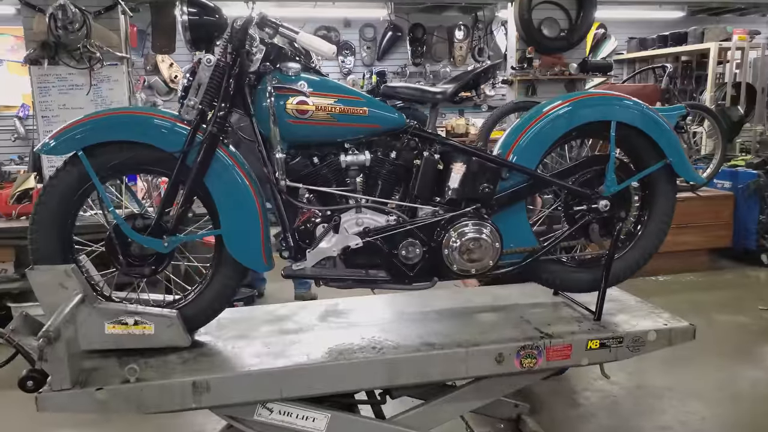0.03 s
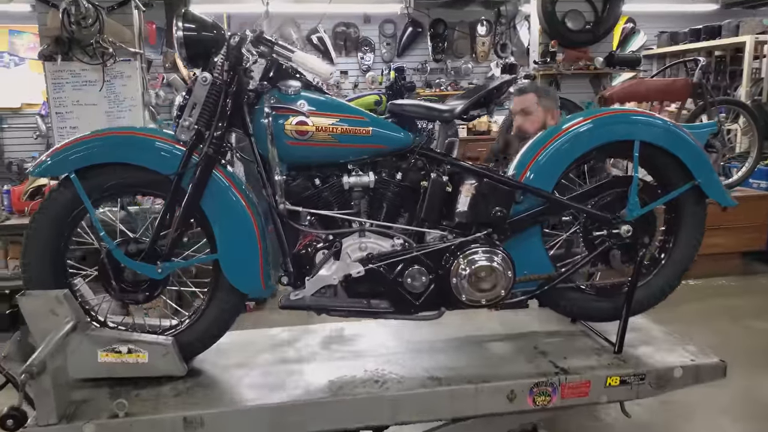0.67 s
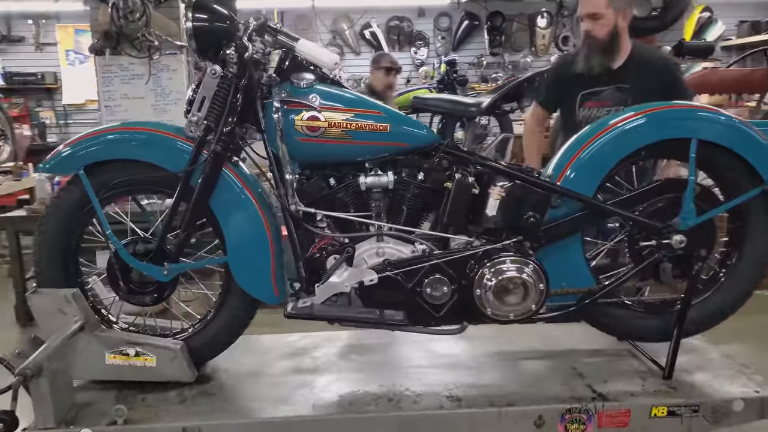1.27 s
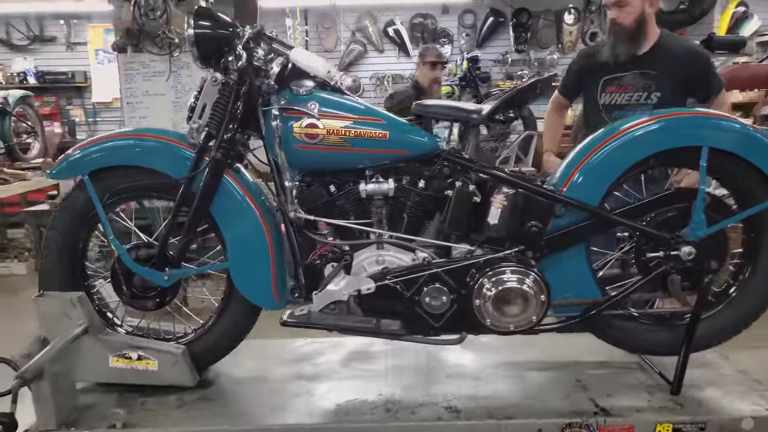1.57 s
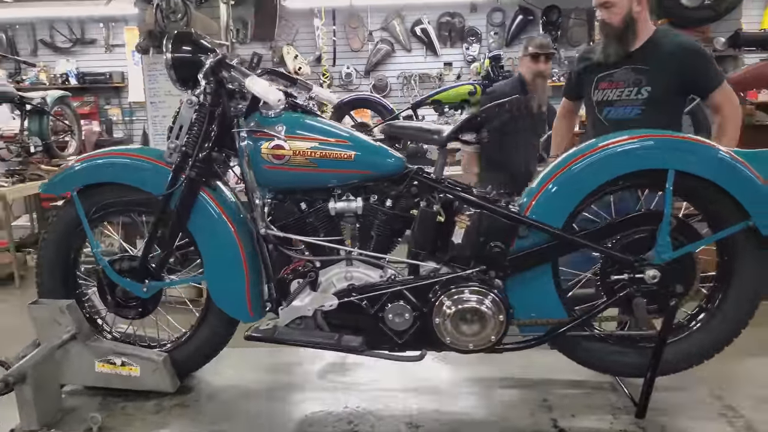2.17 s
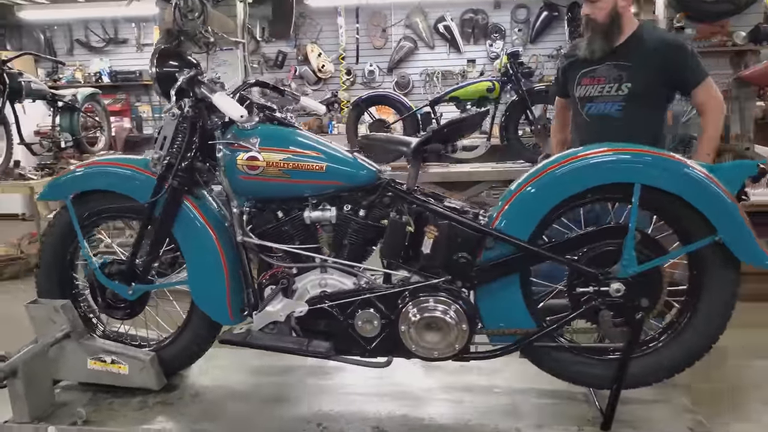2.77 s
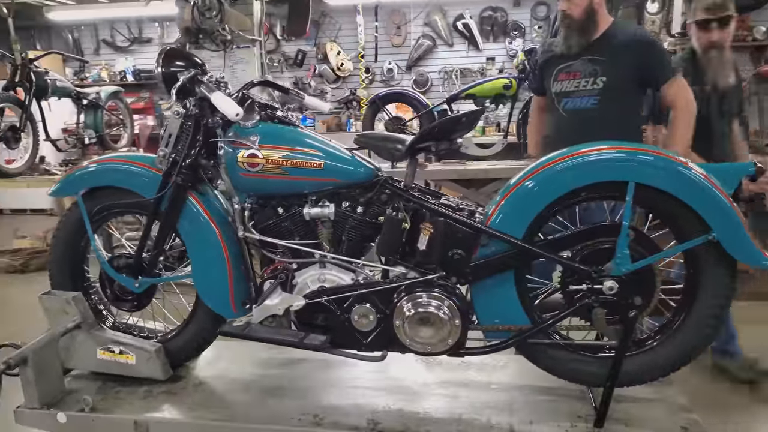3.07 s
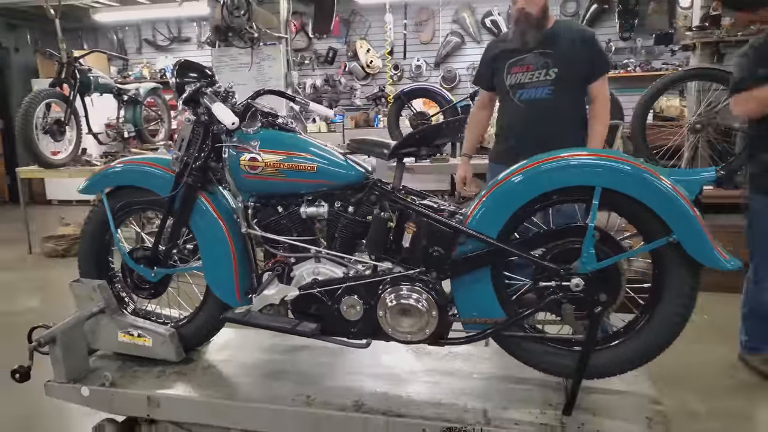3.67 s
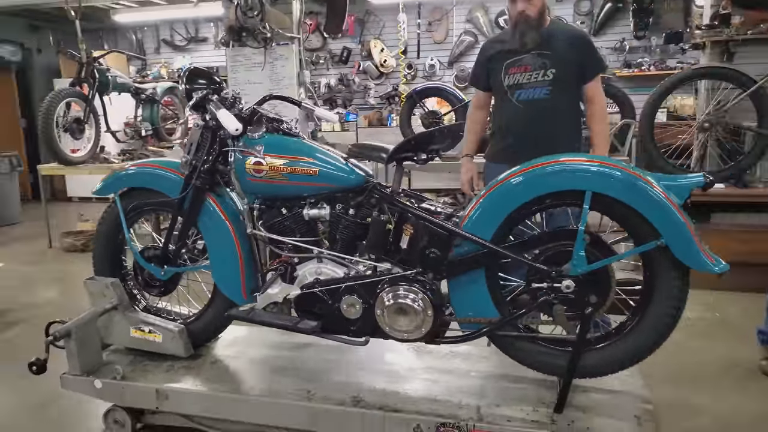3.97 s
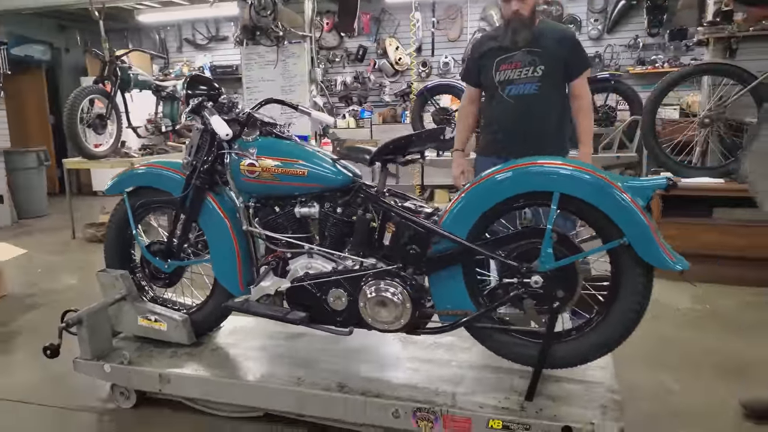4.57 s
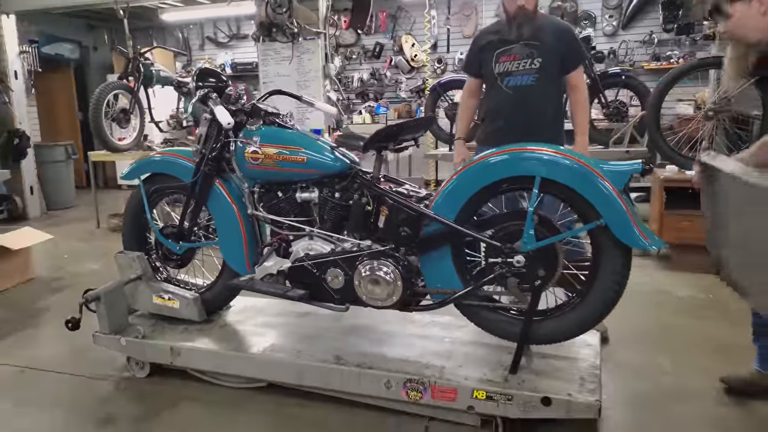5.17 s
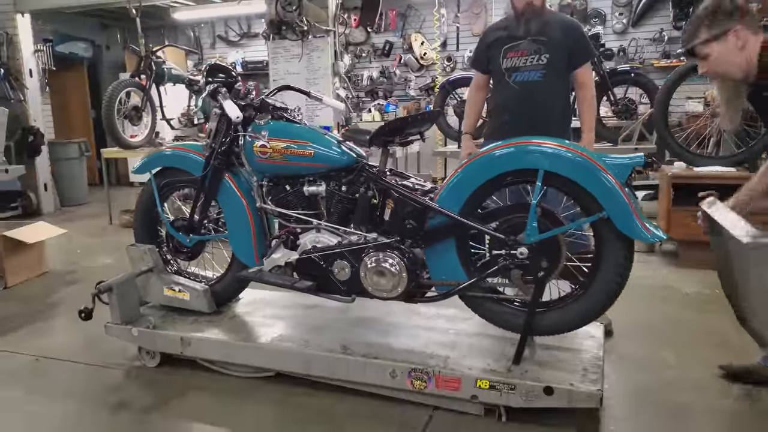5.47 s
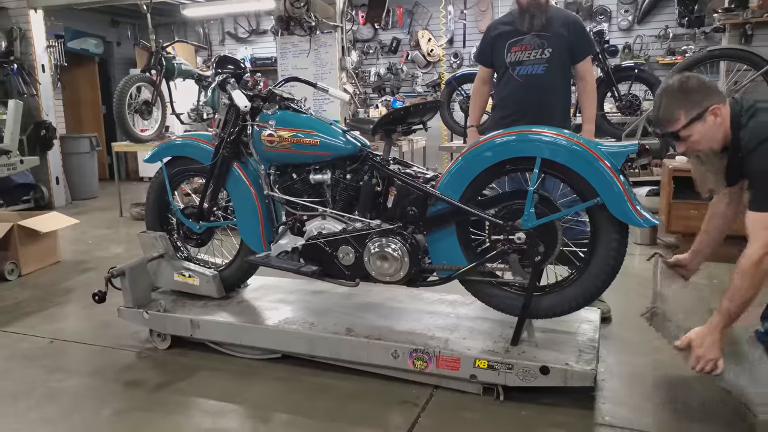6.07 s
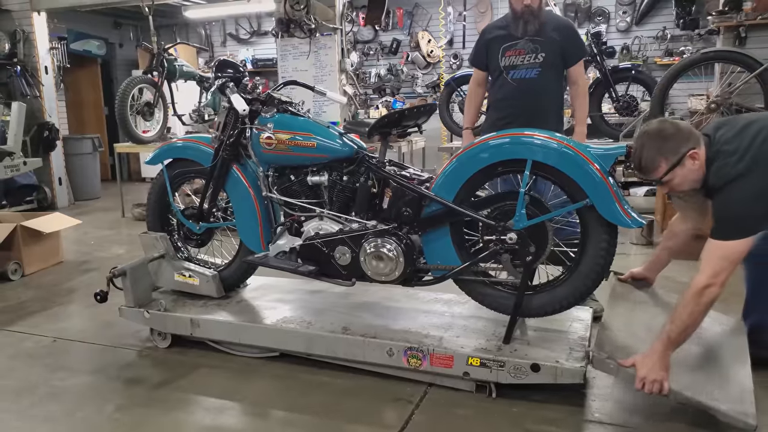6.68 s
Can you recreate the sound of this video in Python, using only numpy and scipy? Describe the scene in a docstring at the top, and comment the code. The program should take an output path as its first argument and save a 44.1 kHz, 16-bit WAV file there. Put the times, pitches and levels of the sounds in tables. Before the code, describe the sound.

A bright, continuous hiss of vented air dominates as a motorcycle lift sinks, heard from a hand-held microphone backing away in a quiet workshop. A few soft footfalls sound underneath. The table touches down with a dull, ringing knock, then smaller knocks and short low groans. As the pressure runs out, the hiss turns hollow and fades, leaving shoe scuffs and the hollow bumps of a steel ramp being set down.

```python
"""Pneumatic lift table sinking

A lift table sinks under a motorcycle in a workshop, heard from a hand-held camera that backs away.
Air hisses from the vent until the pressure is spent; the steel deck rumbles, groans, lands and settles
with a few knocks. Shoes thud and scuff on the concrete while a steel ramp is carried up."""
import sys
import numpy as np
from scipy import signal
from scipy.fft import rfft, irfft
from scipy.io import wavfile
from scipy.ndimage import uniform_filter1d, map_coordinates

SR = 44100
rng = np.random.default_rng(int(sys.argv[2]) if len(sys.argv) > 2 else 0)


def master_out(mix):
    """Clip the mix to full scale and print it as 16-bit PCM to the path in sys.argv[1]."""
    frames = np.transpose(np.atleast_2d(mix))
    ceiling = np.clip(frames, -1, 1)
    pcm = np.round(ceiling * 32767).astype(np.int16)
    wavfile.write(sys.argv[1], SR, pcm)


N = 301203
TIME = np.arange(N) / SR

# room tone of the still workshop: freq_hz, density_db
SHOP_SPECTRUM = [(20, -5), (45, -3), (110, -13), (220, -13), (400, -21.5), (700, -28), (1100, -28),
                 (2500, -33.5), (5000, -31), (15500, -34.5)]
# a hand shifting on the camera: centre_s, length_s, level_db
HAND_BUMPS = [(1.02, .13, -45), (1.16, .11, -40.5), (1.82, 0.11, -53.5), (4.037, 0.093, -38),
              (5.28, 0.081, -36.5), (6.048, 0.27, -62)]
# shoes landing: start_s, peak_db, pitch_hz, t60_s
FOOTFALLS = [(.933, -38, 118, 0.32), (1.039, -43, 90, .25), (1.82, -57, 119, .2), (2.059, -50, 140, .06),
             (2.585, -45, 170, 0.087), (5.789, -49, 129, 0.037), (6.272, -47.5, 129, 0.061),
             (6.592, -43.5, 120, .039)]
# soles scuffing: centre_s, length_s, level_db, pitch_hz, width_hz
SOLE_SCUFFS = [(5.959, .009, -45, 2800, 4500), (6.129, 0.058, -54, 1900, 2200)]
# hollow bumps of the carried ramp: start_s, peak_db, pitch_hz, rebound_loss_db
RAMP_HITS = [(5.861, -32.5, 256, 4.5), (6.309, -36, 273, 8.5)]
# ring of the steel ramp: pitch_hz, width_hz, gain_db
RAMP_MODES = [(1090, 400, -11), (1510, 240, -0.5), (1640, 140, -2), (1816, 98, 0), (3290, 700, -19.5),
              (4730, 1500, -28)]
# ring of the loaded steel deck: pitch_hz, gain_db, t60_s
DECK_MODES = [(71, -13, .55), (124, -4, .42), (153, -13, .45), (200, -5, .95), (236, 0, .38),
              (276, -11, .25), (317, -10, .5), (330, -4, .25), (404, -8, .25), (470, -12, .2),
              (525, -9, .18), (571, -11, .6)]
# tones of the scissor arms under load: pitch_hz, level_db
DESCENT_GROANS = [(125, -51.5), (146, -49.5), (184, -61.5), (276, -59.5), (571, -56)]
# short groans as the frame rebounds: start_s, length_s, pitch_hz, level_db
REBOUND_GROANS = [(4.48, 0.091, 153, -34.5), (4.59, 0.12, 155, -43), (4.95, .08, 190, -43.5)]
# knocks of the settling frame: start_s, peak_db, cutoff_hz, rattle_decay_s, ring_share
FRAME_KNOCKS = [(0.3, -40.5, 331, 0.053, 0.2), (0.365, -39, 480, 0.043, 0.18), (4.106, -22, 650, .02, 1),
                (4.453, -29, 591, 0.056, 0.42), (4.505, -35.5, 379, 0.033, 0.36),
                (4.599, -34, 350, 0.018, .25), (4.954, -36, 298, 0.063, 0.1),
                (5.353, -38.5, 276, 0.03, 0.15)]
# base colour of the vent's jet: freq_hz, density_db
VENT_SPECTRUM = [(100, -36), (330, -38.5), (520, -30.5), (690, -33.5), (810, -22.5), (960, -13.5),
                 (1900, -12), (2700, -7), (3700, 0), (5200, 0), (7500, -1), (9500, -4), (13500, -6.5),
                 (16000, -10)]
# resonances of the vent muffler: pitch_hz, width_hz, gain_db
MUFFLER_MODES = [(2197, 213, 4), (3850, 430, -0.5), (4740, 240, 0.5), (6480, 410, 0.5), (10840, 1000, 2),
                 (14040, 1500, 2)]
# peaks and dips the muffler takes on as the flow weakens: pitch_hz, width_hz, gain_db
HOLLOW_MODES = [(2160, 500, 5.5), (2660, 270, 0), (2980, 450, 4), (4700, 400, -0.5), (6500, 300, 0.5),
                (8100, 500, -3.5), (9650, 800, 5)]
# the vent nearly whistles: centre_s, length_s, pitch_hz, width_hz, boost_db
NEAR_WHISTLES = [(.12, .6, 2170, 200, 5.5), (.78, .7, 5130, 600, 3), (2.0, 0.63, 2260, 221.4, 3.5),
                 (3.52, 0.2, 4050, 179.6, 4), (4.8, .56, 4650, 401, 4.5)]
# rides on the hiss as the camera moves round the vent: time_s, gain_db, treble_db_per_octave
HISS_RIDES = [(0, -23.5, -2.5), (1.0, -23, -3), (2.1, -24, -1.8), (2.9, -22, -5.5), (3.5, -22, -5),
              (4.2, -23, -5.5), (4.8, -23, -4.5)]

SLIDE_STARTS_S, SLIDE_ATTACK_S, LANDS_S = 3.65, 0.071, 4.1
EMPTYING_S, EMPTY_S = 4.765, 6.328  # the pressure runs out between these moments


def undb(db):
    """Decibels to gain."""
    return 10 ** (np.asarray(db) / 20)


def unit(x):
    """Scale to rms 1."""
    return x / np.sqrt(np.mean(x ** 2))


def colour(table, hz):
    """A spectrum's dB at the given frequencies."""
    points, db = np.transpose(table)
    return np.interp(np.log(hz + 1), np.log(points), db)


def hump(f, hz, width_hz):
    """Bell curve of a resonance, 1 at its centre."""
    return 1 / (1 + (2 * (f - hz) / width_hz) ** 2)


def bells(modes, f):
    """EQ curve in dB of a set of resonances."""
    return sum(db * hump(f, hz, width_hz) for hz, width_hz, db in modes)


def noise(curve_db):
    """Noise of rms 1, coloured by an EQ curve."""
    gain = undb(curve_db(np.fft.rfftfreq(N, 1 / SR)))
    return unit(irfft(rfft(rng.standard_normal(N)) * gain, N))


def butter(x, hz, kind, order):
    """Low-pass or high-pass."""
    return signal.sosfilt(signal.butter(order, hz, kind, fs=SR, output="sos"), x)


def band(x, hz, width_hz, passes=2):
    """One broad resonance, steeper with each pass."""
    for _ in range(passes):
        x = signal.lfilter(*signal.iirpeak(hz, hz / width_hz, fs=SR), x)
    return x


def walk(rate_hz):
    """Smooth random drift with a spread near 1."""
    hold = int(SR / rate_hz)
    stairs = np.repeat(rng.standard_normal(N // hold + 1), hold)
    return 1.3 * uniform_filter1d(uniform_filter1d(stairs, hold), hold)[:N]


def since(s):
    """Seconds gone by since a moment, 0 before it."""
    return np.maximum(TIME - s, 0)


def fade(t, t60_s):
    """Decay by 60 dB in t60_s."""
    return np.exp(-np.log(1000) * t / t60_s)


def swell(centre_s, length_s, t):
    """Bell-shaped envelope."""
    return np.exp(-2 * ((t - centre_s) / length_s) ** 2)


def add(out, s, x):
    """Mix a sound in at a time."""
    i = int(s * SR)
    out[i:i + len(x)] += x[:N - i]


def room_tone():
    """Still workshop air, a faint bed weighted to the lows."""
    return noise(lambda f: colour(SHOP_SPECTRUM, f)) * undb(-65.5)


def room(x, t60_s, wet_db):
    """Adds the short diffuse tail of a cluttered workshop."""
    t = TIME[:SR]
    tail = rng.standard_normal(SR) * fade(t, t60_s) * (t > .008)
    return x + undb(wet_db) * signal.fftconvolve(x, tail / np.linalg.norm(tail))[:N]


def handling():
    """Deep bumps carried through the camera's body."""
    rumble = butter(rng.standard_normal(N), 55, "low", order=3)
    rumble = butter(rumble, 24, "high", order=2)
    return unit(rumble) * sum(undb(db) * swell(s, length_s, TIME) for s, length_s, db in HAND_BUMPS)


def thud(peak_db, hz, t60_s, rough, attack_s):
    """A soft, heavy contact: a damped low note roughened by a band of noise."""
    t = TIME[:SR]
    spread = unit(band(rng.standard_normal(SR), hz, 0.69 * hz))
    push = fade(t, t60_s) * (1 - np.exp(-t / attack_s)) ** 2
    note = butter((np.sin(2 * np.pi * hz * t) + rough * spread) * push, 400, "low", order=4)
    return undb(peak_db) * note / np.abs(note).max()


def footsteps():
    """Shoes land on the concrete with a dull thud."""
    out = np.zeros(N)
    for s, db, hz, t60_s in FOOTFALLS:
        add(out, s, thud(db, hz, t60_s, rough=.7, attack_s=.006))
    return out


def scuffs():
    """Rubber drags over grit in short, uneven strokes."""
    out = np.zeros(N)
    for s, length_s, db, hz, width_hz in SOLE_SCUFFS:
        grit = butter(rng.standard_normal(N) * undb(2.3 * walk(300)), 890, "high", order=4)
        out += undb(db) * swell(s, length_s, TIME) * unit(band(grit, hz, width_hz))
    return out


def ramp_bumps(hits=3, gap_s=.047, pitch_ratio=.87):
    """The steel ramp bumps and rebounds, each hit softer and so lower."""
    out = np.zeros(N)
    for s, db, hz, loss_db in RAMP_HITS:
        for k in range(hits):
            bump = thud(db - k * loss_db, hz * pitch_ratio ** k, t60_s=.11, rough=.82, attack_s=.011)
            add(out, s + k * gap_s, bump)
    return out


def ramp_scrape(peak_s=6.312, attack_s=.025, level_db=-50.5):
    """As the ramp is set down, its edge drags over the concrete and rings the steel."""
    grit = rng.standard_normal(N) * undb(2.5 * walk(300))
    ring = sum(undb(db) * band(grit, hz, width_hz) for hz, width_hz, db in RAMP_MODES)
    press = swell(peak_s, attack_s, np.minimum(TIME, peak_s)) * fade(since(peak_s), t60_s=.13)
    return undb(level_db) * unit(ring) * press


def deck_ring():
    """The deck's answer to one blow; each lands on another spot, so the phases are random."""
    t = TIME[:SR]
    return sum(undb(db) * fade(t, t60_s) * np.sin(2 * np.pi * hz * t + rng.uniform(0, 2 * np.pi))
               for hz, db, t60_s in DECK_MODES)


def rollers(shudder_db=-51, shudder_release_s=4.38, rub_release_s=4.995):
    """The scissor rollers shake the deck and rub along their track, harder once it has landed."""
    shaking = butter(rng.standard_normal(N), 93, "low", order=2)
    shudder = unit(signal.fftconvolve(shaking, deck_ring())[:N])
    shudder *= undb(shudder_db) * fade(since(shudder_release_s), t60_s=1.1)
    friction = band(rng.standard_normal(N), hz=456, width_hz=200, passes=1)
    rub = unit(butter(friction, 614, "low", order=12))
    rub_db = np.where(TIME < LANDS_S, -56, -50.5)
    rub *= undb(rub_db) * fade(since(rub_release_s), t60_s=1.8)
    return (shudder + rub) * np.minimum(since(SLIDE_STARTS_S) / SLIDE_ATTACK_S, 1)


def groan(start_s, length_s, hz, db):
    """A dry pivot sings on a wavering low tone."""
    phase = 2 * np.pi * np.cumsum(hz + 1.7 * walk(40)) / SR
    progress = np.clip((TIME - start_s) / length_s, 0, 1)
    load = np.sqrt(np.abs(np.sin(np.pi * progress)))
    return undb(db + 2 * walk(30)) * load * np.sin(phase)


def arm_groans():
    """The scissor arms groan through the last of the descent, then briefly as the frame rebounds."""
    start_s = SLIDE_STARTS_S + SLIDE_ATTACK_S / 2
    descent = sum(groan(start_s, LANDS_S - start_s, hz, db) for hz, db in DESCENT_GROANS)
    return descent + sum(groan(*row) for row in REBOUND_GROANS)


def frame_knocks():
    """The frame drops onto its stops: the deck rings and the loose joints clatter."""
    out, t = np.zeros(N), TIME[:SR]
    for s, db, cutoff_hz, rattle_decay_s, ring_share in FRAME_KNOCKS:
        burst = rng.standard_normal(SR) * np.exp(-t / rattle_decay_s)
        clatter = butter(butter(burst, 170, "high", order=3), 550, "low", order=3)
        blow = ring_share * unit(deck_ring()) + (1 - ring_share) * unit(clatter)
        blow = butter(blow, cutoff_hz, "low", order=4)
        add(out, s, undb(db) * blow / np.abs(blow).max())
    return out


def moving_echoes(x, echo_db, drift_s, count):
    """Paths off floor, deck and benches change as the camera moves, so the hiss swirls."""
    out = x.copy()
    for lag_s in rng.uniform(.002, .016, count):
        delay = (lag_s + drift_s * walk(.7)) * SR
        out += undb(echo_db) * map_coordinates(x, [np.arange(N) - delay], order=1, mode="wrap")
    return unit(out)


def pressure_sag(flow_power=3.85):
    """The dB the hiss loses as the pressure runs out: slowly at first, then ever faster."""
    flow = np.maximum(1 - (since(EMPTYING_S) / (EMPTY_S - EMPTYING_S)) ** 2, .01)
    return -20 * flow_power * np.log10(flow)


def muffler_eq(f, t, sag_db, fully_hollow_db=16.5, wander_db=1.55):
    """The muffler's moving EQ in dB: it wanders, nearly whistles and turns hollow as the flow weakens."""
    hollow = np.minimum(sag_db / fully_hollow_db, 1) * bells(HOLLOW_MODES, f)
    wander = sum(hump(f, hz, width_hz) * np.interp(t, TIME, walk(3.11))
                 for hz, width_hz, _ in MUFFLER_MODES)
    whistles = sum(db * hump(f, hz, width_hz) * swell(s, length_s, t)
                   for s, length_s, hz, width_hz, db in NEAR_WHISTLES)
    return hollow + wander_db * wander + whistles


def vent_hiss(trim_db=3, flutter_db=.59, roar_release_s=4.65, roar_fall_db_per_s=20):
    """A turbulent jet through a muffler; as the pressure drops, its low roar and sizzle fade first."""
    ride_s, *rides = np.transpose(HISS_RIDES)
    ride_db, treble_tilt = (np.interp(TIME, ride_s, ride) for ride in rides)
    sag_db = pressure_sag()
    sizzle_tilt = 4.5 + treble_tilt - .5 * sag_db  # dB per octave
    # the roar fades early and evenly, until the sag overtakes it
    roar_fade_db = np.minimum(sag_db - roar_fall_db_per_s * since(roar_release_s), 0)
    roar_db = 1.14 + 1.8 * walk(9) + roar_fade_db
    jet = noise(lambda f: colour(VENT_SPECTRUM, f) + bells(MUFFLER_MODES, f))
    jet = moving_echoes(jet, echo_db=-15.5, drift_s=.0005, count=6)
    f, t, cells = signal.stft(jet, SR, nperseg=512)
    f = f[:, None] + 1
    sag, sizzle, roar = (np.interp(t, TIME, curve) for curve in (sag_db, sizzle_tilt, roar_db))
    highs_db = sizzle * np.maximum(np.log2(f / 5300), 0)
    lows_db = roar * np.clip(np.log2(2000 / f), 0, 1)
    cells = cells * undb(highs_db + lows_db + muffler_eq(f, t, sag))
    hiss = signal.istft(cells, SR)[1][:N]
    return hiss * undb(trim_db + ride_db - sag_db + flutter_db * walk(24.09))


def scene():
    """Hiss, lift and footwork over the room tone, the same in both channels."""
    bed = room_tone()
    contacts = frame_knocks() + footsteps() + ramp_bumps() + ramp_scrape() + scuffs()
    lift = vent_hiss() + rollers() + arm_groans()
    mix = bed + handling() + lift + room(contacts, t60_s=.46, wet_db=-7.5)
    return np.array([mix, mix])


def record(dry, top_hz=15750):
    """The camera cuts the top end steeply."""
    return signal.sosfilt(signal.ellip(12, .1, 80, top_hz, fs=SR, output="sos"), dry)


dry = scene()
out = record(dry)
master_out(out)
```